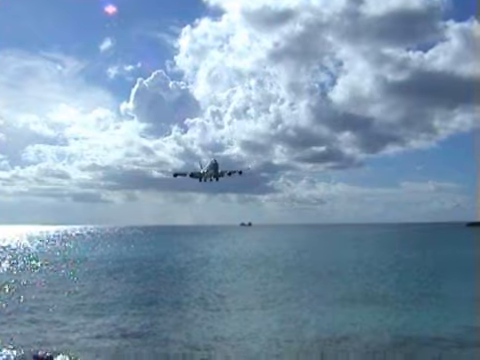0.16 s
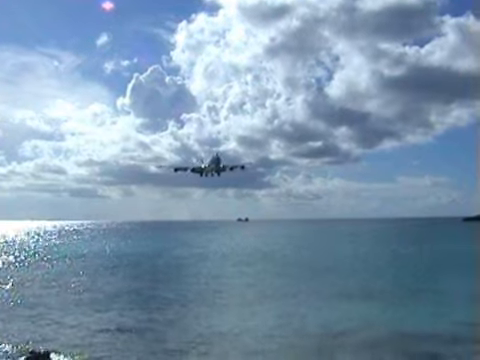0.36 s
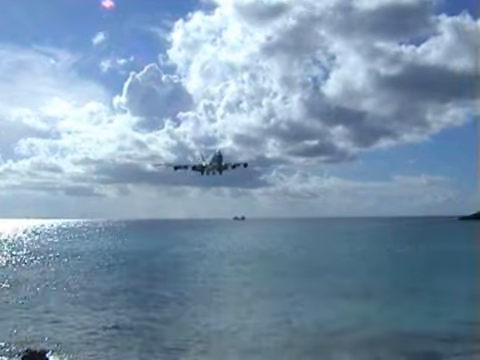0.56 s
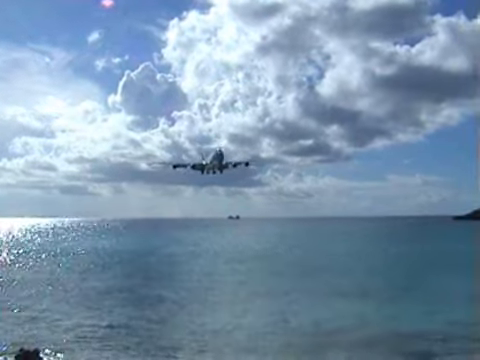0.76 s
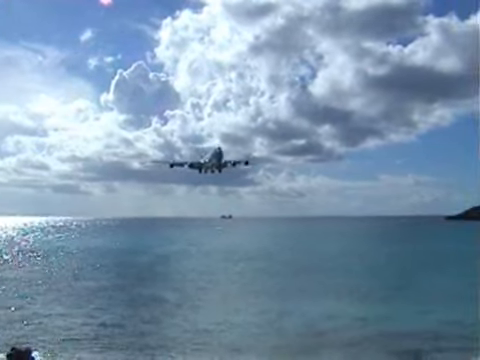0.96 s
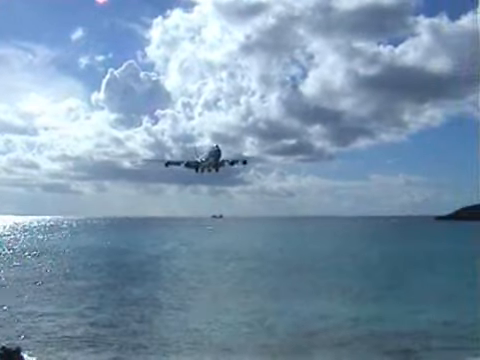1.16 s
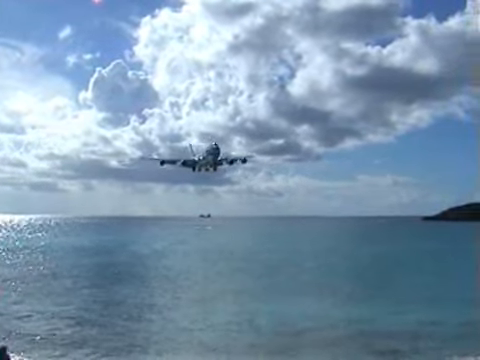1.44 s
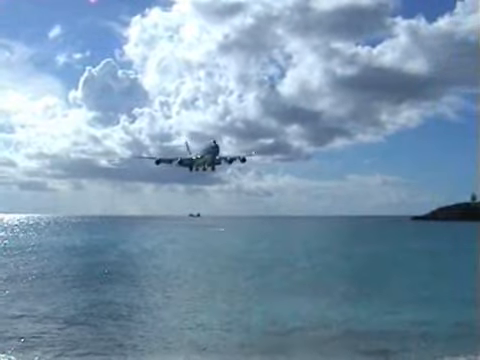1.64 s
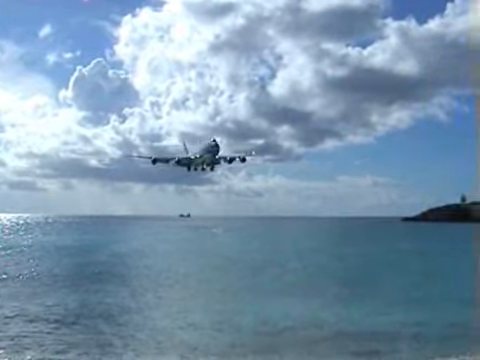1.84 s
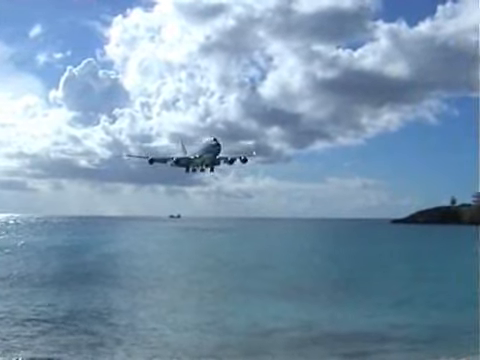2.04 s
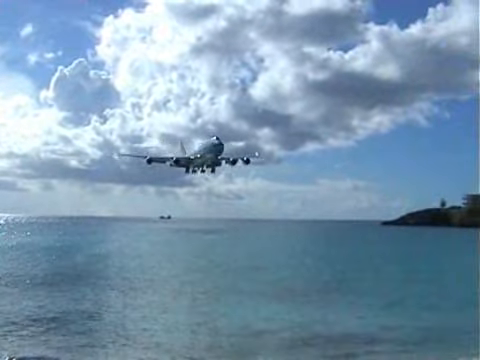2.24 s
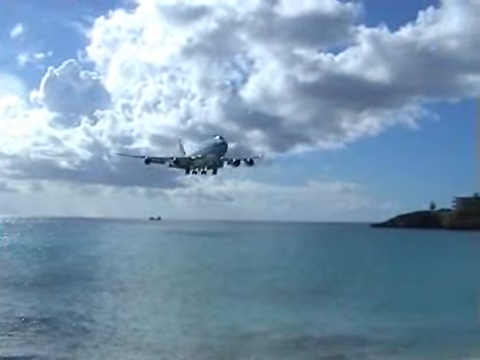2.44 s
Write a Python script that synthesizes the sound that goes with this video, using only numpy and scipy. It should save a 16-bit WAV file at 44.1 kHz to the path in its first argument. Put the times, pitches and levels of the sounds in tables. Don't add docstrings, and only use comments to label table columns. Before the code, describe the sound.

A big jet airliner approaches low over the sea: high, wavering engine whine inside a broad fan rush and softer roar. It cuts in after a brief silence and stays level, outdoors on a hand-held camera microphone.

```python
import sys
import numpy as np
from scipy import signal
from scipy.io import wavfile
from scipy.ndimage import uniform_filter1d, map_coordinates

SR = 44100
rng = np.random.default_rng(int(sys.argv[2]) if len(sys.argv) > 2 else 0)


def store_pcm(level_fs):
    pcm = np.round(np.clip(level_fs, -1, 1) * 32767).astype(np.int16)
    wavfile.write(sys.argv[1], SR, np.atleast_2d(pcm).T)


def undo_db(level):
    steps = np.asarray(level, float) / 20
    return 10 ** steps


N = 113778

# [t/s, f/Hz, level/dB]
LOW_ENGINE = [(.15, 4345, -36), (.3, 4270, -34), (.45, 4215, -32), (.6, 4177, -29), (.75, 4163, -24),
              (.95, 4155, -25), (1.2, 4161, -20), (1.3, 4168, -27), (1.6, 4182, -21), (1.75, 4190, -20),
              (1.9, 4186, -21), (2.1, 4178, -13), (2.2, 4177, -16), (2.3, 4174, -28), (2.4, 4160, -25),
              (2.58, 4138, -16)]
# [t/s, f/Hz, level/dB]
MIDDLE_ENGINE = [(.15, 4362, -26), (.19, 4343, -19), (.3, 4291, -19), (.5, 4212, -16), (.6, 4192, -18),
                 (.66, 4181, -25), (.7, 4177, -17), (.85, 4172, -15), (1.0, 4174, -17), (1.1, 4176, -26),
                 (1.3, 4190, -25), (1.5, 4205, -19), (1.62, 4213, -16), (1.8, 4215, -27), (1.95, 4210, -20),
                 (2.15, 4192, -28), (2.3, 4186, -19), (2.58, 4165, -28)]
# [t/s, f/Hz, level/dB]
HIGH_ENGINE = [(.15, 4390, -36), (.4, 4285, -33), (.6, 4228, -27), (.75, 4206, -26), (.95, 4201, -25),
               (1.1, 4204, -22), (1.3, 4206, -31), (1.5, 4225, -26), (1.75, 4236, -21), (2.0, 4233, -24),
               (2.2, 4219, -32), (2.4, 4211, -24), (2.58, 4210, -22)]
# [multiple of the blade tone, level under it/dB, blur/Hz]
ROTOR_STAGES = [(.383, -15, 13.58), (.763, -14.5, 15.97), (.862, -13, 22), (1.241, -17.5, 18),
                (1.421, -26.5, 14), (2.0, -29.5, 6)]
# [f/Hz, width/Hz, level/dB]
AIRFRAME_WHISTLES = [(188.6, 14, -41), (577, 30, -31.5), (628.7, 30, -33), (922, 60, -34.5)]
# [t/s, distance/m, jet roar level/dB, fan rush level/dB]
FLIGHT = [
    (.15, 840, -18, -11),
    (.3, 950, -20, -14),
    (.6, 854, -20, -15),
    (.85, 810, -21, -17),
    (1.149, 845, -20, -15),
    (1.45, 805, -20.5, -14),
    (1.698, 725, -22, -16.5),
    (2.0, 700, -22.5, -15.5),
    (2.3, 633, -23.5, -14),
    (2.58, 644, -21.5, -13.5),
]
# [f/Hz, level per Hz/dB]
ROAR_SPECTRUM = [(20, -40), (45, -12), (110, -8), (170, 0), (400, -1), (620, 2), (950, 1.5), (1500, -42)]
# [f/Hz, level per Hz/dB]
RUSH_SPECTRUM = [(500, -50), (1000, -2.5), (2300, -3.5), (4000, -4.5), (5000, -8), (8000, -21),
                 (10000, -31.5), (11200, -96)]
# [f/Hz, width/Hz, level/dB]
GROUND_COLOUR = [(436, 20, -2), (1143, 89, -5.5), (1554, 150, 2.5), (1790, 68, -4.5), (2210, 200, 5),
                 (3080, 750, -1), (3430, 360, 2.5), (5090, 170, -2.5)]
# [f/Hz, left-right likeness 0..1]
LIKENESS = [(30, .93), (90, 1), (300, 0.96), (700, 0.98), (2000, 0.94), (5000, 0.87), (6800, 0.99),
            (8300, .45)]
# [t/s, length/s, level/dB]
COMPRESSOR_SWELLS = [
    (.9, .12, -30),
    (1.4, .12, -31),
    (1.9, .08, -25),
    (2.33, .06, -23),
]
# [f/Hz, level under the local centre/dB]
CENTRE_DEPTH = [(200, 25.5), (3000, 24), (5700, 21), (7600, 14), (8800, 9), (9800, 1.5), (10500, 0),
                (11200, -11)]
# [f/Hz, level under the local centre/dB]
SIDE_DEPTH = [(60, 28), (250, 15), (900, 13), (4200, 15), (5500, 8), (7200, -1), (8200, 5), (9000, -3)]
# [t/s, length/s, threshold rise/dB]
THIN_MOMENTS = [
    (0.206, .04, 15),
    (2.383, 0.02, 5),
    (2.552, 0.05, 9),
]

WHINE_FLICKER_DB, STAGE_FLICKER_DB, WHINE_BLUR_HZ = 1.1, 4, 3.5
WHINE_LEFT_DB, WHINE_LEAD_RAD = 1.6, 0.31
HISS_HZ, HISS_WIDTH_HZ = 3710, 280
MID_DISTANCE_M = 770
AIR_DB_PER_M_AT_8K, AIR_POWER = 0.0228, 2.43
CEILING, KNEE = 0.82, 8.6
THIN_FRAME_DB, THIN_BAND_DB = 2, 2.2
START_S, FADE_IN_S = 0.1489, 0.0084


def unit(x):
    return x / np.sqrt(np.mean(np.abs(x) ** 2) + 1e-20)


def along(points, hz):
    f, v = np.transpose(points)
    return np.interp(np.log(hz + 1), np.log(f + 1), v)


def curves(rows):
    s, *cols = np.transpose(rows)
    return [np.interp(np.arange(N) / SR, s, c) for c in cols]


def wobble(rate):
    knots = rng.standard_normal(800)
    return map_coordinates(knots, [np.clip(np.arange(N) * rate / SR, 0, 799)])


def swells(t, rows):
    return [(np.exp(-.5 * ((t - s) / length) ** 2), db) for s, length, db in rows]


def tone(hz, blur_hz):
    return np.exp(2j * np.pi * np.cumsum(hz + blur_hz * wobble(45)) / SR)


def narrow(hz, width_hz):
    envelope = unit(wobble(width_hz) + 1j * wobble(width_hz))
    return np.sqrt(2) * np.real(envelope * np.exp(2j * np.pi * hz * np.arange(N) / SR))


def patchy_noise(spectrum, patchy_db, patch_bins, patch_frames):
    hz, _, z = signal.stft(rng.standard_normal((2, N)), SR, nperseg=1024)
    field = uniform_filter1d(rng.standard_normal(z.shape[1:]), patch_bins, axis=0)
    field = uniform_filter1d(field, patch_frames, axis=1)
    colour_db = sum(db * np.exp(-.5 * ((hz - c) / w) ** 2) for c, w, db in GROUND_COLOUR)
    turn = np.arccos(np.clip(along(LIKENESS, hz), -1, 1)) / 2
    gain = undo_db(along(spectrum, hz) + colour_db) * [np.cos(turn), np.sin(turn)]
    z = z * gain[..., None] * undo_db(patchy_db * unit(field))
    mid, side = signal.istft(z, nperseg=1024)[1][:, :N]
    return unit(np.array([mid + side, mid - side]))


def engines():
    whine = np.zeros(N, complex)
    for table in (LOW_ENGINE, MIDDLE_ENGINE, HIGH_ENGINE):
        hz, db = curves(table)
        whine += undo_db(db + WHINE_FLICKER_DB * wobble(30.6)) * tone(hz, WHINE_BLUR_HZ)
        for ratio, under_db, blur_hz in ROTOR_STAGES:
            stage_db = .5 * db - 11 + under_db + STAGE_FLICKER_DB * wobble(11)
            whine += undo_db(stage_db) * tone(ratio * hz, blur_hz)
    left_right = np.array([1, -1])
    ports = undo_db(WHINE_LEFT_DB / 2 * left_right) * np.exp(.5j * WHINE_LEAD_RAD * left_right)
    return np.sqrt(2) * np.real(ports[:, None] * whine)


def airflow():
    _, roar_db, rush_db = curves(FLIGHT)
    whistle = sum(undo_db(db + 0.52 * wobble(3.4)) * narrow(hz, w) for hz, w, db in AIRFRAME_WHISTLES)
    whistle = whistle * undo_db(3.34 * (roar_db - roar_db.mean()))
    shimmer_db = .5 * wobble(9)
    roar = patchy_noise(ROAR_SPECTRUM, patchy_db=1.07, patch_bins=5, patch_frames=9)
    roar = roar * undo_db(roar_db + shimmer_db)
    fans = patchy_noise(RUSH_SPECTRUM, patchy_db=1.6, patch_bins=16, patch_frames=7)
    fans = fans * undo_db(rush_db + shimmer_db + 0.37 * wobble(25))
    return roar + whistle + fans


def compressor():
    level = sum(undo_db(db) * bell for bell, db in swells(np.arange(N) / SR, COMPRESSOR_SWELLS))
    return narrow(HISS_HZ, HISS_WIDTH_HZ) * level


def air(x):
    hz, t, z = signal.stft(x, SR, nperseg=512)
    s, metres = np.transpose(FLIGHT)[:2]
    extra_m = np.interp(t, s, metres) - MID_DISTANCE_M
    loss_db = AIR_DB_PER_M_AT_8K * np.outer((hz / 8000) ** AIR_POWER, extra_m)
    return signal.istft(z * undo_db(-loss_db), nperseg=512)[1][:, :N]


def scene():
    return air(engines() + compressor() + airflow())


def thinned(x):
    frame = dict(window="cosine", nperseg=2048, noverlap=1024)
    hz, t, z = signal.stft(np.array([x[0] + x[1], x[0] - x[1]]) / 2, SR, **frame)
    power = uniform_filter1d(np.abs(z[0]) ** 2, size=32, axis=0)
    local_level = np.sqrt(np.abs(uniform_filter1d(power, size=21, axis=1)))
    bands = np.repeat(rng.standard_normal((2, 65, len(t))), 16, axis=1)[:, :len(hz)]
    rise_db = THIN_FRAME_DB * rng.standard_normal((2, 1, len(t))) + THIN_BAND_DB * bands
    rise_db[0] += sum(db * bell for bell, db in swells(t, THIN_MOMENTS))
    depth_db = np.array([along(CENTRE_DEPTH, hz), along(SIDE_DEPTH, hz)])[..., None]
    heard = np.abs(z) > local_level * undo_db(rise_db - depth_db)
    mid, side = signal.istft(z * heard, SR, **frame)[1][:, :N]
    return np.array([mid + side, mid - side])


def roll_off(x):
    return signal.sosfilt(signal.butter(12, 11010, fs=SR, output="sos"), x)


def record(dry):
    rounded = dry / (1 + np.abs(dry / CEILING) ** KNEE) ** (1 / KNEE)
    fade_in = np.clip((np.arange(N) / SR - START_S) / FADE_IN_S, 0, 1) ** 2
    mix = thinned(rounded) * fade_in
    return roll_off(mix)


dry = scene()
out = record(dry)
store_pcm(out)
```